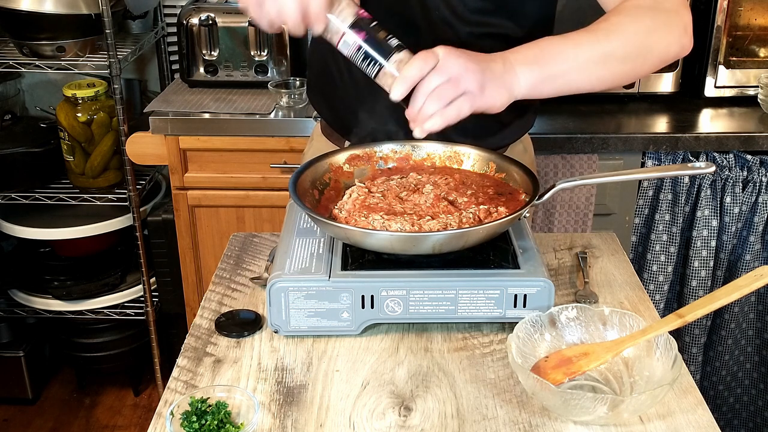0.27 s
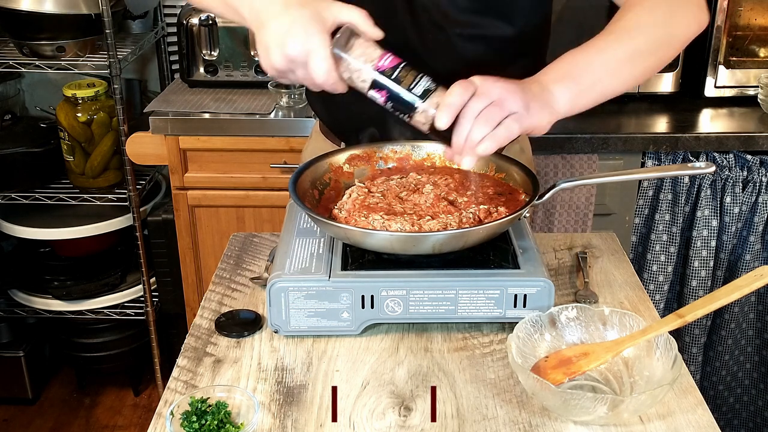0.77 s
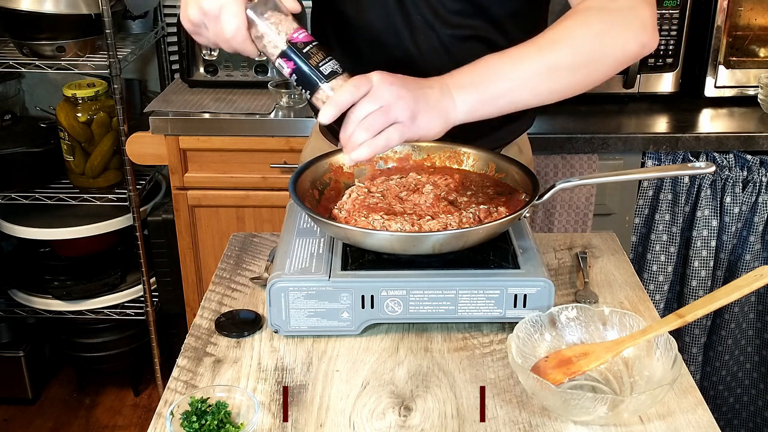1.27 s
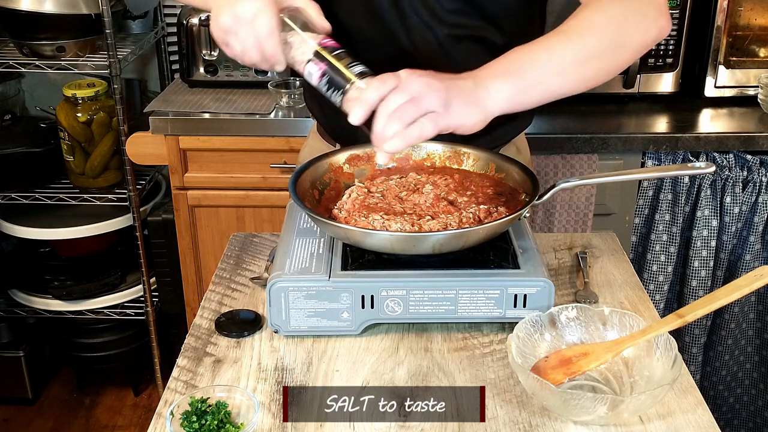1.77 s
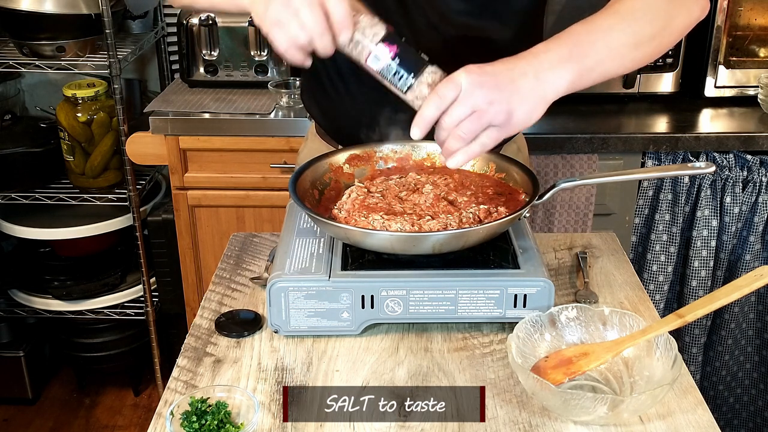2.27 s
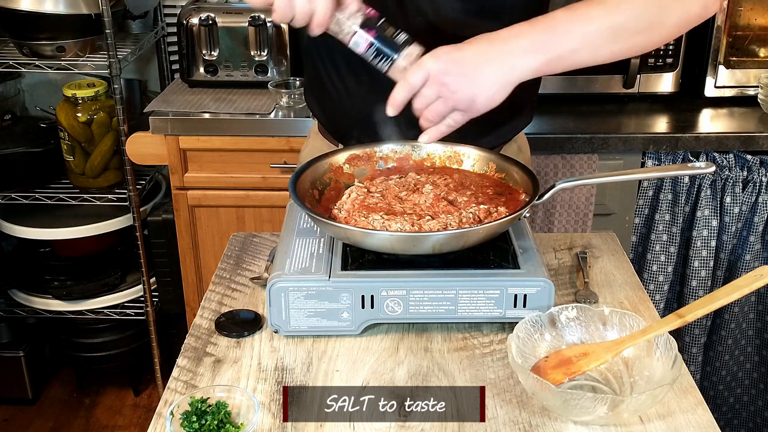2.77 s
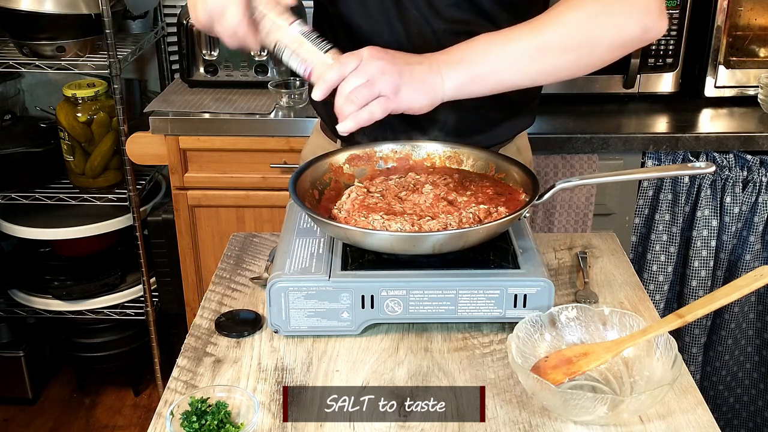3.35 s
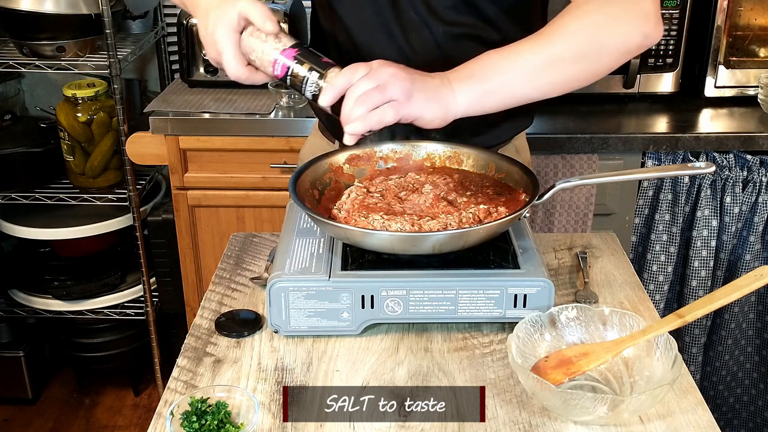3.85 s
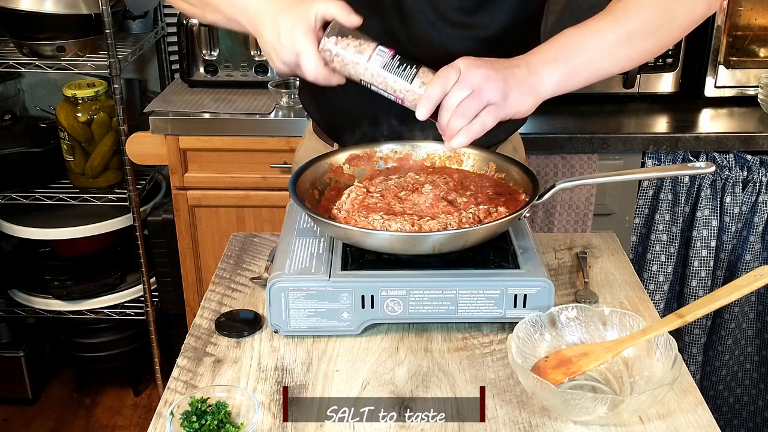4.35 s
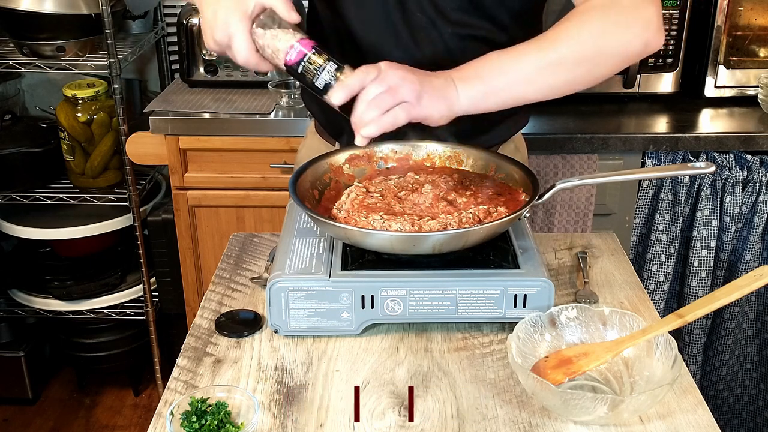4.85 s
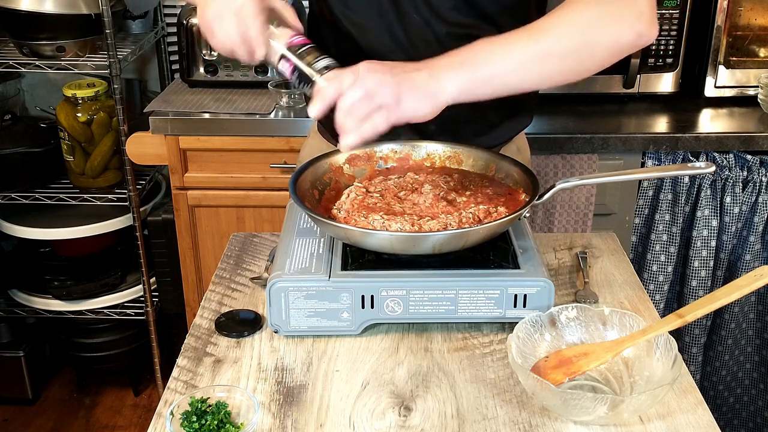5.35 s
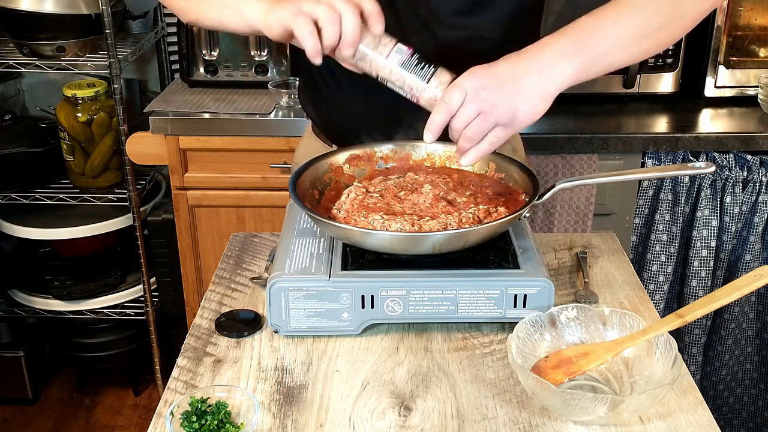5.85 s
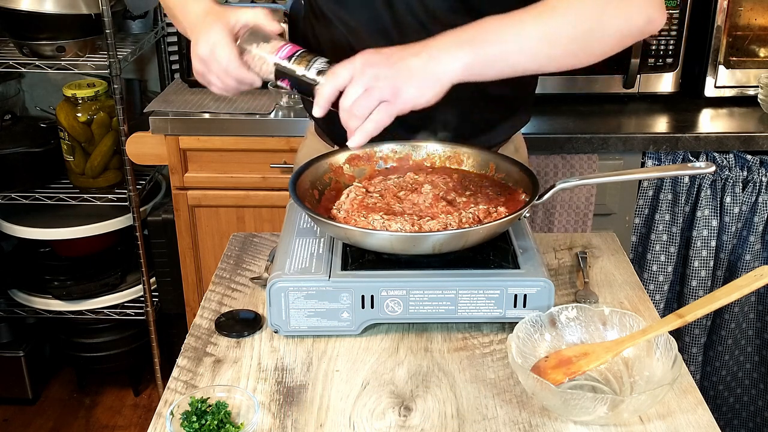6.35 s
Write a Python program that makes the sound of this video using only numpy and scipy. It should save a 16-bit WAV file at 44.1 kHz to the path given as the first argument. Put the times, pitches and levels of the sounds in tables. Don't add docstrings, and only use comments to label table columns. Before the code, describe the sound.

A plastic salt grinder is twisted back and forth in sharp gritty crunches, coarse crystals cracking and rattling over faint burner hiss in a small kitchen.

```python
import sys
import numpy as np
from scipy import signal
from scipy.fft import rfft, irfft, next_fast_len
from scipy.io import wavfile
from scipy.ndimage import uniform_filter1d

SR = 44100
rng = np.random.default_rng(int(sys.argv[2]) if len(sys.argv) > 2 else 0)


def unload_audio(sound):
    columns = np.transpose(np.atleast_2d(sound))
    steps = np.round(np.clip(columns, -1, 1) * 32767)
    wavfile.write(sys.argv[1], SR, steps.astype(np.int16))


def invert_db(level):
    return 10 ** (np.asarray(level, dtype=float) / 20)


N = 290574

# frequency in Hz, density in dB per Hz.
ROOM_TONE_SPECTRUM = [(22, -22), (107, -11), (296, -4), (475, -4), (593, 3.5), (949, -8), (2800, -13),
                      (7500, -13.5)]
# frequency in Hz, width in Hz, level in dB.
MACHINE_HUM = [(192, 30, -66), (590, 110, -60)]
# frequency in Hz, t60 in seconds.
KITCHEN_DECAY = [(300, 0.63), (1500, 0.46), (4000, 0.28), (8000, 0.44)]
# frequency in Hz, gain in dB.
MIC_EDGE = [(7300, 0), (7700, -2), (8000, -15), (8350, -18.5), (8650, -63), (9000, -110)]

# frequency in Hz, gain in dB.
NO_BASS = [(90, -40), (190, 0), (9000, 0)]
# frequency in Hz, gain in dB.
THIN_WALL = [(150, -35), (400, -6.5), (900, -4.5), (9000, -0.5)]
# frequency in Hz, gain in dB.
RATTLE_SPECTRUM = [(1500, -37), (2600, -7.5), (3500, -2), (5000, -1.5), (6300, 1), (7400, -0.5),
                   (9000, -6.5)]
# frequency in Hz, gain in dB.
BOTTLE_SPECTRUM = [(500, -49.5), (900, -2), (1250, 3.5), (1700, 1.5), (2400, 7.5), (3300, 7), (5000, -15.5)]
# resonance in Hz, width in Hz, level in dB.
GRIP_MODES = [(326.6, 31, -7), (460, 725, -5.5), (699.4, 152, -5.5)]
# resonance in Hz, width in Hz, level in dB.
NECK_MODES = [(1270, 52, 0)]
# time in seconds, note in Hz.
BOTTLE_NOTE = [(0.0, 1500), (0.49, 1472), (0.6, 1830), (0.66, 1463), (1.23, 1540), (3.43, 1486),
               (3.48, 1303), (4.25, 1773), (4.69, 1345), (4.76, 1620), (5.66, 1350), (5.79, 1820),
               (5.92, 1275), (5.97, 1597), (6.47, 1462), (6.58, 1690)]

# bite in seconds, burr loaded in seconds, burr level in dB,
# salt rattling in seconds, rattle level in dB.
TWISTS = [(.290, 0.1, -16, 0.14, -14), (.751, 0.043, -12, 0.11, -12.5), (1.172, 0.077, -13, 0.11, -14.5),
          (1.635, 0.09, -19, 0.13, -13), (2.087, 0.077, -16, 0.13, -12), (2.401, 0.01, -21, 0.014, -18),
          (2.528, 0.0067, -19, 0.015, -14.5), (2.862, 0.12, -17.5, 0.16, -16),
          (3.339, 0.085, -15.5, 0.11, -12), (3.825, 0.072, -17, 0.091, -13.5),
          (4.258, 0.075, -14.5, 0.11, -11.5), (4.745, 0.1, -13.5, .14, -12.5),
          (5.199, 0.084, -16.5, .15, -14.5), (5.614, 0.099, -15.5, 0.15, -13),
          (6.004, 0.1, -16.5, .15, -14.5)]
# bite in seconds, burr loaded in
# seconds, burr level in dB, # salt rattling in seconds, rattle level in dB.
RETURNS = [(0.0, 0.006, -19.5, 0.0042, -16.5), (.085, 0.1, -22, .2, -22), (.56, .06, -24, .11, -20),
           (.973, 0.078, -23.5, 0.27, -23), (1.442, .07, -23, 0.54, -25.5), (1.861, 0.094, -26, .2, -23.5),
           (2.307, 0.033, -25.5, 0.022, -22.5), (2.797, 0.045, -22, 0.13, -21),
           (3.10, 0.023, -33, 0.011, -28.5), (3.803, .03, -18, .03, -21.5), (2.062, .03, -28, .03, -25.5),
           (6.36, .12, -37, .1, -36), (4.46, 0.05, -30, 0.069, -29.5), (4.657, 0.017, -23.5, .02, -19.5),
           (4.996, 0.093, -23, 0.15, -21.5), (5.415, 0.078, -20.5, 0.13, -19.5),
           (5.840, 0.058, -23.5, .12, -20), (6.235, 0.058, -21.5, 0.079, -21.5)]
# start in seconds, length in seconds, rattle level in dB.
SLIDES = [(1.363, 0.051, -25), (2.453, 0.007, -35), (3.214, 0.013, -27), (3.248, 0.061, -17),
          (3.736, 0.054, -23), (3.70, .03, -37.5), (4.072, 0.057, -28), (4.133, 0.038, -16),
          (4.189, 0.02, -17.5), (6.355, 0.061, -28.5), (.50, 0.064, -24.5), (4.567, 0.071, -18.5),
          (6.531, 0.011, -34.5), (6.555, .05, -24.5)]
# start in seconds, peak in dB, burr over rattle in dB,
# t60 in seconds.
CRUNCHES = [(0.344, 2, -6, 0.11), (0.777, -21, -9, 0.035), (0.7786, 7, -16, 0.087),
            (0.8132, 10, -9.5, 0.046), (1.2412, 8, -7, 0.094), (1.4393, -3, -17, 0.026),
            (1.4953, -13, 5.5, 0.07), (1.6650, 4, -6, 0.1), (2.4007, -7.5, 5.5, 0.076),
            (2.4134, 0, -19, 0.02), (2.5247, -10.5, 6.5, 0.08), (2.863, 2.5, -1, 0.14),
            (2.9794, -27, -9, 0.027), (3.879, 0.5, -3.5, 0.025), (4.2857, -15, 10, 0.028),
            (4.328, 7, -6, 0.02), (4.6555, -6.5, 8, 0.013), (4.8462, 5.5, -8.5, 0.028),
            (4.995, -14, 14, 0.035), (6.0197, -12, 9, 0.056), (.303, -2, 4, .05), (2.1515, 3, -3, .03),
            (5.1983, -6, 6, .04), (1.635, -4, 3, 0.018)]
# start in seconds, peak in dB, bottle knock in Hz, snap in Hz,
# knock over snap in dB.
BIG_CRACKS = [(0.8131, 4.5, 1550, 3300, -4.5), (1.6656, 7.5, 2380, 6400, 1), (0.3446, 8.5, 1720, 5460, 19),
              (0.7583, 4, 1300, 5740, 0.5), (1.1899, 3, 2570, 6460, -8), (1.2411, 6, 2130, 5960, 3),
              (1.4427, -5, 1870, 3320, 2.5), (3.8821, 0.5, 1650, 6900, -9.5), (2.1159, 2.5, 2750, 3230, -7),
              (2.1526, 4, 1830, 6400, 3.5), (2.1823, 3, 2920, 5470, -28.5), (2.5288, 5.5, 1850, 3500, -5.5),
              (3, -2, 1660, 3630, 11.5), (2.863, 1, 1230, 6420, 26), (3.3402, -4, 1820, 6400, 18),
              (3.3827, 5, 2020, 6300, 3), (4.2587, -4.5, 2100, 2840, 30.5), (4.7934, 1.5, 2270, 2920, -28),
              (4.9962, 0, 1670, 3120, 14), (3.9, 6, 1700, 5700, -1), (5.4422, -1, 1380, 3520, 16),
              (2.4006, 5.5, 1260, 3900, 1), (5.673, 2.5, 2360, 4500, -8), (4.8479, 3.5, 1200, 6000, -9)]
# start in seconds, peak in dB, snap in Hz.
FURTHER_CRACKS = [(.7512, 0.5, 3350), (4.7442, -6.5, 1610), (.2899, -5, 1700), (0.9764, -20.5, 2740),
                  (1.8611, -16, 2500), (6.2654, -5.5, 1500), (2.3185, -10.5, 6000), (2.4847, -9.5, 6640),
                  (2.733, -21.5, 4400), (2.996, -5, 7500), (3.111, -11.5, 2700), (3.2197, -11, 5540),
                  (3.45, -4, 7000), (4.101, -14, 6840), (4.135, -11.5, 4500), (4.561, -13.5, 6000),
                  (5.2439, -2, 4360), (5.297, -5.5, 3000), (5.6973, -2, 1500), (5.7575, -11.5, 4870),
                  (5.84, -10, 2800), (5.8713, -4, 4100), (5.936, -6.5, 3020), (6.0082, -6, 1860),
                  (6.246, -9.5, 1700), (6.2942, -5, 2720), (6.3549, -9, 6950), (6.5178, -16, 7840),
                  (6.547, -15, 6400), (6.5673, -13.5, 6370)]
# start in seconds, held in seconds,
# level in dB, note in Hz.
AIR_RINGS = [
    (.751, .04, -27, 1234),
    (2.409, 0.022, -26, 1283),
    (2.868, 0.065, -23.5, 1270),
    (3.94, 0.086, -38.5, 1710),
    (4.66, 0.029, -31, 1244),
    (5.0, .06, -31, 1144),
    (5.198, 0.053, -24.5, 1183),
    (5.615, .1, -24, 1266),
]

# rise in s, drift while held in dB/s, release in dB/s.
TWIST_BURR, TWIST_RATTLE = (.003, -33, -170), (.012, 18, -260)
RETURN_BURR, RETURN_RATTLE = (.0048, -19.5, -200), (.021, -10, -250)
SLIDE_RATTLE, AIR_SHAPE = (.043, 5, -250), (.0089, -64, -250)
CONTROL_STEP = 32


def evened(x):
    return x / np.sqrt(np.mean(x ** 2) + 1e-20)


def steadied(x):
    return x / np.sqrt(uniform_filter1d(x ** 2, size=3000) + 1e-12)


def slow_noise(size):
    smooth = uniform_filter1d(rng.standard_normal(N), size=size)
    return evened(uniform_filter1d(smooth, size=size))


def read(points, hz):
    f, value = np.transpose(points)
    return np.interp(np.log(hz + 1), np.log(f + 1), value)


def coloured(x, points):
    size = next_fast_len(len(x))
    gain = invert_db(read(points, np.fft.rfftfreq(size, 1 / SR)))
    return irfft(rfft(x, size) * gain, size)[:len(x)]


def ring(x, modes):
    out = np.zeros(len(x))
    for hz, width_hz, db in modes:
        r = np.exp(-np.pi * width_hz / SR)
        zeros = [1 - r * r, 0, r * r - 1]
        poles = [1, -2 * r * np.cos(2 * np.pi * hz / SR), r * r]
        once = signal.lfilter(zeros, poles, x) / 2
        out += invert_db(db) * signal.lfilter(zeros, poles, once) / 2
    return out


def clicks(per_s, spread_db, clump_db):
    size_db = spread_db * np.minimum(rng.exponential(1, N), 2.8) + clump_db * slow_noise(200)
    arrives = rng.random(N) < per_s / SR
    return invert_db(size_db) * rng.choice([-1., 1.], N) * arrives


def pings(train, hz, cycles):
    out = np.zeros(N)
    steps_hz = np.geomspace(600, 8400, num=40)
    kind = np.searchsorted(steps_hz, hz)
    for k, f in enumerate(steps_hz):
        r, w = np.exp(-f / cycles / SR), 2 * np.pi * f / SR
        poles = [1, -2 * r * np.cos(w), r * r]
        out += np.sqrt(f) * signal.lfilter([0, r * np.sin(w)], poles, train * (kind == k))
    return out


def room_tone():
    hiss = invert_db(-42) * evened(coloured(rng.standard_normal(N), ROOM_TONE_SPECTRUM))
    hum = np.zeros(N)
    for hz, width_hz, db in [*MACHINE_HUM, (60.5, 7.1, -66)]:
        hum += invert_db(db) * evened(ring(rng.standard_normal(N), [(hz, width_hz, 0)]))
    return hiss + hum


def kitchen(x):
    out = np.zeros(N)
    turn = np.arange(N) / SR * np.pi / .45
    at = np.arange(120, SR // 2 - 20, 20)
    for k in range(3):
        taps = np.zeros(SR // 2)
        taps[at + rng.integers(0, 20, len(at))] = rng.choice([-1., 1.], len(at))
        hz, t, z = signal.stft(taps, SR, nperseg=256)
        t60_s = np.maximum(read(KITCHEN_DECAY, hz), .02)[:, None]
        tail = signal.istft(z * invert_db(-60 * t / t60_s), SR, nperseg=256)[1]
        window = np.sqrt(2 / 3) * np.cos(turn + k * np.pi / 3)
        out += signal.fftconvolve(x * window, tail / np.linalg.norm(tail))[:N]
    return out


def stroke(s, hold_s, db, shape):
    rise_s, drift, release = shape
    t = np.arange(0, N, CONTROL_STEP) / SR - s
    held_s = np.clip(t, 0, hold_s)
    creep = (t < 0) * invert_db(-14 + 380 * np.minimum(t, 0)) ** 2
    rise = np.clip(.5 + t / max(rise_s, .001), 0, 1) ** 2 + creep
    level_db = db + drift * (held_s - hold_s / 2) + release * np.maximum(t - hold_s, 0)
    return rise * invert_db(level_db) ** 2


def wrist():
    loose = burr = grip = invert_db(-66) ** 2
    for rows, burr_shape, rattle_shape, grip_db in ((TWISTS, TWIST_BURR, TWIST_RATTLE, -16),
                                                    (RETURNS, RETURN_BURR, RETURN_RATTLE, -10)):
        grip_shape = np.multiply(burr_shape, [1, 1, 1.72])
        for s, load_s, burr_db, rattle_s, rattle_db in rows:
            loose = loose + stroke(s, rattle_s, rattle_db, rattle_shape)
            burr = burr + stroke(s, load_s, burr_db, burr_shape)
            grip = grip + stroke(s, load_s, burr_db + grip_db, grip_shape)
    for s, length_s, db in SLIDES:
        loose = loose + stroke(s, length_s, db, SLIDE_RATTLE)
        burr = burr + stroke(s, length_s, db - 14.5, SLIDE_RATTLE)
    powers = (loose, burr / loose, grip / loose)
    return [np.repeat(10 * np.log10(p), CONTROL_STEP)[:N] for p in powers]


def bottle_air():
    grit = clicks(1500, 2.7, 1.3)
    out = np.zeros(N)
    for s, held_s, db, hz in AIR_RINGS:
        level = np.repeat(np.sqrt(stroke(s, held_s, db, AIR_SHAPE)), CONTROL_STEP)[:N]
        out += level * evened(ring(grit, [(hz, 125, 0)]))
    return out


def small_cracks():
    rattle_db, load_db, _ = wrist()
    when, size, knock, snap, mix = rng.random(size=(180, 5)).T
    at = (when * N).astype(int)
    db = np.minimum(rattle_db[at] + 8 + 4 * np.log(size + .01), -10)
    knock_hz, snap_hz = 1100 * 2.1 ** knock, 3000 * 2.4 ** snap
    knock_db = 1.1 * load_db[at] + 16 * (mix - .5)
    return np.transpose([at / SR, db, knock_hz, snap_hz, knock_db])


def cracks():
    t = np.arange(2500) / SR
    out = np.zeros(N + len(t))
    ticks = [(s, db, 1500, snap_hz, -11.5) for s, db, snap_hz in FURTHER_CRACKS]
    for s, db, knock_hz, snap_hz, knock_db in [*BIG_CRACKS, *ticks, *small_cracks()]:
        lands = rng.random(len(t)) < .03
        splinters = rng.standard_normal(len(t)) * lands * .3 * invert_db(-60 * t / .06)
        splinters[0] = 1
        snap = np.sin(2 * np.pi * snap_hz * t) * invert_db(-60 * t / .0033)
        knock = np.sin(2 * np.pi * knock_hz * t) * invert_db(-60 * t / .0058)
        share = invert_db(knock_db) / (1 + invert_db(knock_db))
        sound = signal.fftconvolve(splinters, share * knock + (1 - share) * snap)[:len(t)]
        at = round(s * SR)
        out[at:at + len(t)] += invert_db(db + 5) * rng.choice([-1, 1]) * sound
    return coloured(out[:N], THIN_WALL)


def rattle(crush, load_db):
    lowest_hz = np.clip(2900 * invert_db(-.3 * load_db), 2200, 6000)
    hz = lowest_hz * (8200 / lowest_hz) ** rng.random(N)
    loose = evened(pings(clicks(6000, 2.2, 1.2), hz, 2.9))
    dry_ticks = 1.74 * invert_db(.5 * np.minimum(load_db, 0)) * evened(crush)
    return steadied(coloured(loose + dry_ticks, RATTLE_SPECTRUM))


def burr(crush):
    note_hz = np.interp(np.arange(N) / SR, *np.transpose(BOTTLE_NOTE))
    scatter = rng.standard_normal(N) * np.where(rng.random(N) < .4, .1, .42)
    grains = crush + 1.76 * clicks(2500, 1.5, .3)
    grit = evened(pings(grains, note_hz * np.exp(scatter), 1.61))
    neck = evened(ring(crush, NECK_MODES))
    return steadied(coloured(grit + .5 * evened(crush) + .053 * neck, BOTTLE_SPECTRUM))


def grip(crush):
    return steadied(ring(crush + 3.35 * clicks(900, 2.26, 1.1), GRIP_MODES))


def patchy(x):
    z = signal.stft(x, nperseg=256)[2]
    patches = rng.standard_normal(z.shape)
    for _ in range(2):
        patches = uniform_filter1d(uniform_filter1d(patches, size=4, axis=0), size=8, axis=1)
    return signal.istft(z * invert_db(1.6 * evened(patches)), nperseg=256)[1][:N]


def grinder():
    rattle_db, load_db, grip_db = wrist()
    load_db = load_db + 2 * slow_noise(700)
    loose = invert_db(rattle_db - 2)
    loaded = invert_db(rattle_db + load_db - 3.63)
    for s, db, burr_db, t60_s in CRUNCHES:
        at = round(s * SR)
        after = slice(at, at + 6000)
        since_s = np.arange(N)[after] / SR - s
        collapse = invert_db(db - 9.5 - 60 * since_s / max(t60_s, .005))
        loose[after] = np.hypot(loose[after], collapse)
        loaded[after] = np.hypot(loaded[after], invert_db(burr_db) * collapse)
    crush = clicks(1100, 4, 1.6)
    held = invert_db(rattle_db + grip_db - 2.2)
    return loose * rattle(crush, load_db) + loaded * burr(crush) + held * grip(crush)


def scene():
    grind = patchy(grinder()) + bottle_air()
    limited = grind / (1 + (grind / .9) ** 4) ** .25
    salt = coloured(limited, NO_BASS) + cracks()
    return (salt + invert_db(-9) * kitchen(salt) + room_tone())[None]


def band_limit(x):
    return signal.sosfilt(signal.butter(12, 15900, fs=SR, output="sos"), x)


def record(dry):
    clipped = np.clip(coloured(dry[0], MIC_EDGE), -1, 1)
    return band_limit(clipped[None])


dry = scene()
out = record(dry)
unload_audio(out)
```